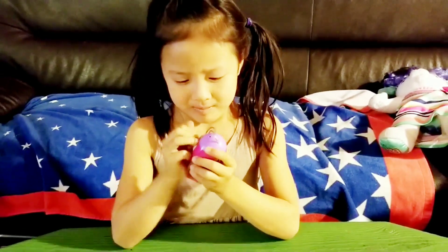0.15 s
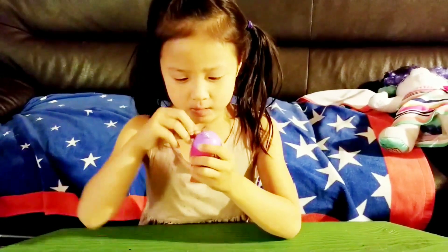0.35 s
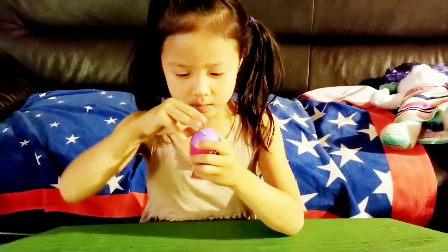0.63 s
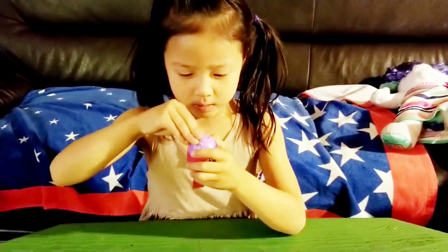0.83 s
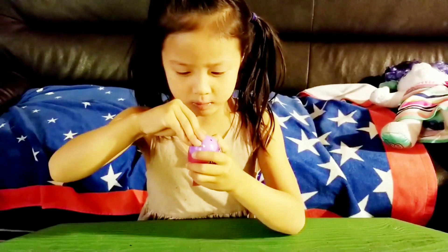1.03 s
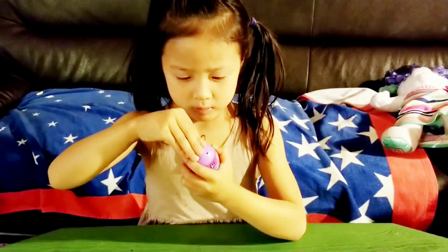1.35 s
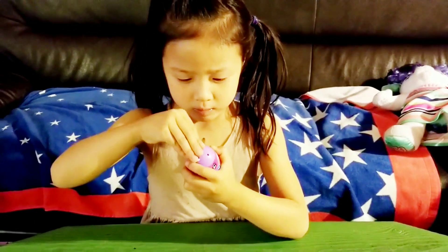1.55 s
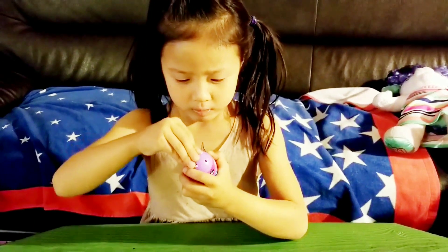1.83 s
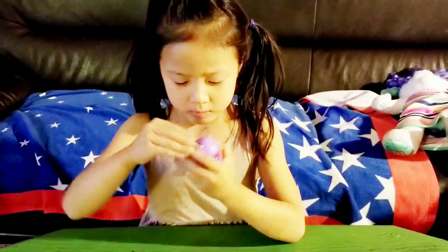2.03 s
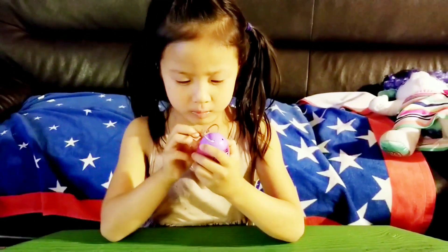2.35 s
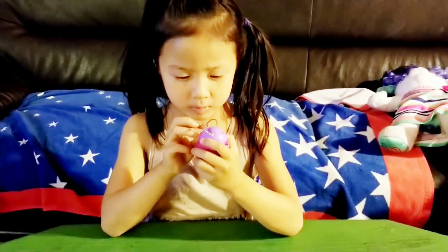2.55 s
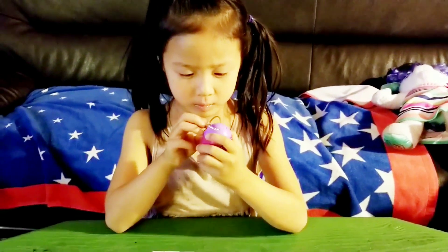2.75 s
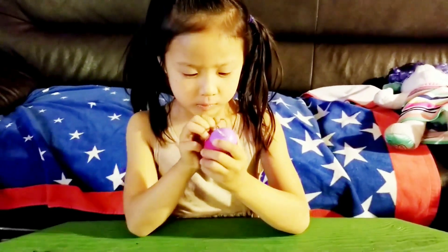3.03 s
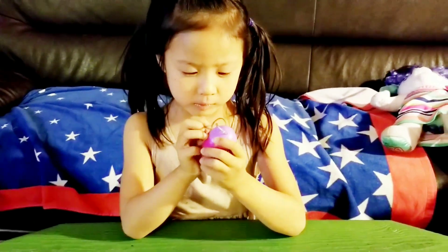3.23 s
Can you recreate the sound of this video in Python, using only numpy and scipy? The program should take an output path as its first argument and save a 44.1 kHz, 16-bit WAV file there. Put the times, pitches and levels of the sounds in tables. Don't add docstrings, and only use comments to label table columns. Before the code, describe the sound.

Small hollow plastic capsule clicks and snaps as fingers twist it in a quiet room

```python
import sys
import numpy as np
from scipy import signal
from scipy.fft import rfft, irfft
from scipy.io import wavfile
from scipy.ndimage import uniform_filter1d, minimum_filter1d

SR = 44100
rng = np.random.default_rng(int(sys.argv[2]) if len(sys.argv) > 2 else 0)


def gain_from_db(level_db):
    decades = np.asarray(level_db, float) / 20
    return 10 ** decades


def store_wav(level_fs):
    pcm = np.round(np.clip(np.atleast_2d(level_fs), -1, 1) * 32767)
    wavfile.write(sys.argv[1], SR, pcm.T.astype(np.int16))


N = 149940


def evened(x):
    return x / np.sqrt(np.mean(x ** 2) + 1e-20)


def wander(count, size):
    once = uniform_filter1d(rng.standard_normal(count), size=size)
    return evened(uniform_filter1d(once, size=size))


def read(points, hz):
    f, value = np.transpose(points)
    return np.interp(np.log(hz + 1), np.log(f + 1), value)


def add(mix, s, sound):
    part = mix[round(s * SR):][:len(sound)]
    part += sound[:len(part)]


def resonate(x, hz, width):
    turn = np.exp(2j * np.pi * np.cumsum(hz * np.ones(len(x))) / SR)
    r = np.exp(-np.pi * abs(width) / SR)
    return 2 * (turn * signal.lfilter([1 - r], [1, -r], x / turn + 1e-18)).real


def coloured(x, gain_db):
    log = np.log(gain_from_db(np.maximum(gain_db(np.fft.rfftfreq(1024, 1 / SR)), -90)))
    cepstrum = irfft(log) * np.r_[1, 2 * np.ones(511), 1, np.zeros(511)]
    return signal.fftconvolve(x, irfft(np.exp(rfft(cepstrum))))


def whitened(x):
    z = rfft(x)
    return irfft(z / np.sqrt(uniform_filter1d(abs(z) ** 2, size=5) + 1e-20), len(x))


def bell(hz, centre_hz, octaves):
    return -6 * (np.log2((hz + 20) / centre_hz) / max(octaves, .1)) ** 2


# f/Hz, width/Hz, level/dB
HUM = [(95.26, 21, -65), (190, 27, -60), (354, 29, -70), (828.6, 48, -76.5)]


def hum():
    out = np.zeros(N)
    for hz, width, db in HUM:
        noise = rng.standard_normal(N)
        out += gain_from_db(db) * evened(resonate(resonate(noise, hz, width), hz, width))
    return out


# f/Hz, level/dB
AIR = [(25, -4), (100, -1.5), (300, -8), (900, -26.5), (2200, -32), (5100, -43), (5800, -48.5),
       (10300, -47)]


def air():
    frames, hz = N // 256 + 5, np.fft.rfftfreq(1024, 1 / SR)
    a, b, patches = rng.standard_normal((frames, 513, 3)).T
    patches = uniform_filter1d(patches, size=10, axis=0)
    patches = evened(uniform_filter1d(patches, size=12, axis=1))
    z = (a + 1j * b) * gain_from_db(read(AIR, hz)[:, None] + 1.6 * patches)
    noise = signal.istft(z, nperseg=1024, noverlap=768)[1][:N]
    return gain_from_db(-55) * evened(noise) + hum()


# t/s, level/dB
RUB = [
    (.0, -55),
    (0.1, -62),
    (.17, -95),
    (1.7, -95),
    (1.8, -66),
    (1.87, -64),
    (1.93, -95),
    (3.3, -95),
    (3.4, -62),
]
# f/Hz, width/Hz, level/dB
RUB_BODY = [(2920, 17, 3.5), (3080, 160, -7.5), (4206, 190, -5)]


def rub():
    noise, (s, db) = rng.standard_normal(N), np.transpose(RUB)
    drift = 1 + .01 * wander(N, size=3000)
    body = np.zeros(N)
    for hz, width, gain_db in RUB_BODY:
        once = resonate(noise, hz * drift, 2.8 * width)
        body += gain_from_db(gain_db) * evened(resonate(once, hz * drift, 4.0 * width))
    pressure_db = np.interp(np.arange(N) / SR, s, db) + 0.73 * wander(N, size=400)
    return gain_from_db(pressure_db) * evened(body)


# f/Hz, width/Hz, level/dB
FIDGET = [(1500, 700, -81), (3300, 700, -81), (4500, 1100, -78)]


def fidget():
    out = np.zeros(N)
    for hz, width, db in FIDGET:
        hz = hz * (1 + .06 * wander(N, size=4000))
        level = gain_from_db(db + 3.2 * wander(N, size=1800))
        noise = rng.standard_normal(N)
        out += level * evened(resonate(resonate(noise, hz, width), hz, width))
    return out


# f/Hz, width/Hz, level/dB
SHELL = [(1339, 200, -14.5), (1820, 440, -14), (3050, 330, 1), (4170, 2200, -8), (5087, 200, -4),
         (5880, 340, -5), (6800, 560, -10.5), (7800, 120, -10.5), (8510, 950, -6.5), (9700, 490, -10.5)]


def shell(x):
    return sum(gain_from_db(db) * resonate(x, hz, width) for hz, width, db in SHELL)


def scrape(length, db, hz, octaves):
    grains_per_s, grain_spread_db = 5000, 0.5
    chance, size, value = rng.random((4000, 3)).T[:, :round(length * SR)]
    slips = (chance < grains_per_s / SR) * gain_from_db(-grain_spread_db * np.log(size + 0.00044))
    grains = (value - .5) * (0.28 + slips)
    grains *= np.sin(np.pi * np.linspace(0, 1, len(grains)) ** .7) ** 1.3
    both = evened(grains) + 1.3 * evened(shell(grains))
    return gain_from_db(db) * evened(coloured(both, lambda f: bell(f, hz, octaves)))


# t/s, length/s, level/dB, centre f/Hz, spread/octaves
SCRAPES = [(0.0102, 0.012, -47.5, 4277, 1.9), (0.028, 0.067, -48, 4130, 1), (0.1, 0.047, -54, 5500, 0.9),
           (0.143, 0.075, -58, 3800, 0.59), (1.227, 0.036, -77.5, 2720, 0.13),
           (1.778, 0.017, -62, 860, 0.29), (1.099, 0.018, -48, 1450, 0.68), (1.1, 0.035, -54, 470, 0.77),
           (0.87, 0.0085, -71.5, 5880, 0.059), (1.887, 0.037, -53.5, 600, 0.78),
           (0.021, 0.034, -58.5, 700, 0.28), (.44, .06, -61, 480, .5), (1.472, .008, -72, 3900, .4),
           (0.366, 0.045, -63, 5200, .8), (0.434, 0.042, -64, 4500, 0.4), (0.6, 0.04, -54, 800, .75),
           (0.59, 0.07, -61, 3830, 0.7), (.71, 0.045, -59.5, 521, 0.53), (0.901, 0.039, -71, 2850, 0.27),
           (1.097, 0.05, -43.5, 4536, 1.12), (1.467, 0.054, -81.5, 5200, 0.74),
           (1.609, 0.033, -74, 2380, 0.26), (1.769, 0.07, -55, 4100, 0.95), (1.888, 0.032, -48, 1935, 1.37),
           (2.013, 0.074, -68, 4340, 0.2), (2.483, .02, -84, 6000, 1.35), (2.767, 0.038, -57.5, 5432, 1.5),
           (2.853, 0.047, -80, 8650, 0.71), (2.971, 0.036, -47.5, 5200, 0.69),
           (3.098, 0.1, -47, 4968, 1.345), (3.134, 0.023, -41.5, 3900, 1.1),
           (3.119, 0.038, -51, 1046, 0.31), (3.163, 0.028, -54.5, 3650, 0.12),
           (3.358, 0.039, -57.5, 3480, 0.7)]


def scrapes():
    out = np.zeros(N)
    for s, *row in SCRAPES:
        add(out, s, scrape(*row))
    return out


# f/Hz, level/dB
CRACK = [(180, -57), (300, 1.5), (1790, -16), (2060, -2), (4090, 0.5), (6820, 2), (8350, -29.5),
         (10100, -15.5), (12300, -39), (16000, -76), (22000, -120)]


def snap(peak_db, hz, ring, stretch):
    snap_s, focus_oct, focus_db = .0012, .18, 11
    t = np.arange(900) / SR / np.clip(stretch, .4, 4)
    cracks = rng.standard_normal(len(t)) * rng.exponential(1, len(t))
    cracks *= t / snap_s * np.exp(-2 * t / snap_s)
    cracks = whitened(cracks) * np.exp(-(t / snap_s / 2.5) ** 4)
    ring = np.clip(ring, 0, 1)
    direct = evened(coloured(cracks, lambda f: read(CRACK, f))[:len(t)])
    body = (1 - ring) * direct + ring * evened(shell(cracks))

    def focus(f):
        low_cut = 6 * np.log2(np.clip(f / 900, .01, 1))
        return focus_db * gain_from_db(bell(f, hz, focus_oct)) + low_cut

    body = coloured(body, focus)
    return gain_from_db(peak_db - 6) * body / abs(body).max()


# t/s, peak level/dB, brightest f/Hz, shell ring share 0-1, relative length
SNAPS = [(0.0202, -3, 5830, 0.45, 0.68), (0.021, -3, 4100, 0.5, 0.79), (.0221, -3.5, 7830, 0.52, 1.3),
         (0.0309, -18.5, 3330, 0.8, 1.3), (0.0401, -15, 3030, 0.8, 2), (0.048, -18, 3670, 0.3, 1.3),
         (0.062, -21, 6660, 1, 1.8), (0.111, -45, 7000, 0.4, 1.1), (0.1384, -15.5, 4460, 0.49, 1.13),
         (0.595, -42, 4300, 0.37, 4.3), (0.6828, -27.5, 4870, 0.73, 1.8), (0.6895, -29, 6200, 0.46, 1.13),
         (0.8753, -39, 5840, 1, 1.4), (1.0928, -21, 5300, 0.54, 3.2), (1.1005, -21.5, 4040, 0.1, 2),
         (1.1038, -13, 4150, 0, 3), (1.115, -31, 4400, .4, 2.5), (1.7859, -26, 4630, 0.5, 2.96),
         (1.8889, -19.5, 5600, 0.56, 2.5), (1.896, -28, 3700, 0.29, 1.1), (1.9009, -17.5, 4200, 0.5, 1.45),
         (2.7645, -23, 2900, 0.9, 1.3), (2.797, -31.5, 4930, 0.23, 1.5), (2.9736, -29, 3050, 1, 1.07),
         (2.98, -23.5, 3010, 1, 1.12), (3.038, -32.5, 5030, 0.5, 0.79), (3.1168, -27.5, 5100, 0, 2.3),
         (3.1226, -8, 4660, 0.84, 2.3), (3.129, -14.5, 3130, 0.37, 1.5), (3.1317, -15.5, 4320, 0.6, 3.1),
         (3.1367, -15.5, 3200, 0.8, 2.2), (3.174, -30, 3280, 0.6, 1.5), (3.184, -46, 3080, 1, 1.8),
         (3.167, -32, 3200, 0.7, 1.1), (3.2063, -32, 3080, 0.5, 0.87), (3.2285, -16, 5000, 0, 1.07),
         (3.229, -20, 3080, 1, 1.1), (3.3467, -23.5, 4090, 0.48, 1.6), (3.3557, -25, 2730, 1, 1.1)]


def snaps():
    out = np.zeros(N)
    for s, *row in SNAPS:
        add(out, s, snap(*row))
    return out


def decay(db, hz, t60, rise_s, waver_db, loose):
    t = np.arange(0, .6, 1 / SR)
    turns = np.cumsum(hz * (1 + loose * wander(len(t), size=400))) / SR
    db = db - 60 * t / t60 + waver_db * wander(len(t), size=500)
    return gain_from_db(db) * np.sqrt(2) * np.sin(2 * np.pi * turns) * (1 - np.exp(-t / rise_s))


THUMP_S = [.025, .04, .045, .07, .6, 1.1, 1.11, 1.775, 1.89, 2.29, 2.87, 3.13, 3.17, .03, 1.13, 1.9, .93]
# level/dB, f/Hz, t60/s
THUMPS = [(-40.5, 71, 0.2), (-41, 170, 0.4), (-39, 210, 0.28), (-42.5, 330, 0.52), (-53.5, 310, 0.23),
          (-29.5, 64, 0.059), (-40, 95, 0.25), (-46.5, 67, 0.13), (-42.5, 87, 0.24), (-79, 96, 0.093),
          (-36, 218, 0.05), (-43, 61, 0.2), (-44, 280, 0.14), (-40, 260, 0.083), (-41.5, 200, .25),
          (-43.5, 210, 0.23), (-57.5, 570, 0.19)]


def thumps():
    out = np.zeros(N)
    for s, row in zip(THUMP_S, THUMPS):
        add(out, s, decay(*row, rise_s=.006, waver_db=2.5, loose=.2))
    return out


# t/s, level/dB, f/Hz, t60/s
RINGS = [
    (.155, -56, 4360, .5),
    (.284, -49, 4360, .12),
    (.225, -61, 3957, .5),
    (.032, -44, 5018, .12),
    (1.325, -71, 3520, .2),
    (1.37, -73, 4250, .12),
    (1.502, -69, 4280, .2),
    (1.62, -72, 4020, .2),
    (1.685, -74, 3040, .5),
]


def rings():
    out = np.zeros(N)
    for s, *row in RINGS:
        add(out, s, decay(*row, rise_s=0.012, waver_db=3.0, loose=0.003))
    return out


# f/Hz, t60/s
ROOM = [(250, 1), (660, 0.28), (1740, 0.32), (4590, 0.22), (10000, 0.15)]


def room(x):
    taps = np.zeros(SR // 2)
    at = np.arange(180, SR // 2 - 12, 12)
    taps[at + rng.integers(0, 12, len(at))] = rng.choice([-1., 1.], len(at))
    hz, t, z = signal.stft(taps, SR, nperseg=256)
    fall_db = -60 * t / read(ROOM, hz)[:, None]
    tail = signal.istft(z * gain_from_db(fall_db), SR, nperseg=256)[1]
    return signal.fftconvolve(x, tail / np.linalg.norm(tail))[:N]


def turning_room(x):
    turn = np.arange(N) / SR * 9
    tails = sum(room(x * np.cos(turn + k * np.pi / 3)) for k in range(3))
    return tails * np.sqrt(2 / 3)


# f/Hz, level/dB
SIDE_TILT = [(40, -2.5), (300, -5), (1000, -1), (4000, 5.5), (8000, 15.5), (12000, 8)]


def side_field(hand):
    side_air = coloured(air(), lambda f: read(SIDE_TILT, f))[:N]
    return gain_from_db(-18.5) * (side_air + gain_from_db(-4) * room(hand))


def scene():
    hand = rub() + fidget() + scrapes() + snaps()
    mid = hand + thumps() + rings() + gain_from_db(-7) * turning_room(hand) + air()
    side = side_field(hand)
    return np.array([mid + side, mid - side])


def top_cut(x):
    return signal.sosfilt(signal.butter(12, 12470, fs=SR, output="sos"), x)


# t/s, level/dB
TOP_BAND = [(.0, -18.5), (.2, -16.5), (1.0, -29), (2.75, -13.5)]


def record(dry):
    t = np.arange(N) / SR
    high_pass = signal.butter(2, 900, "high", fs=SR, output="sos")
    high = signal.sosfiltfilt(high_pass, dry)
    level_db = 10 * np.log10(abs(uniform_filter1d((high ** 2).mean(0), 180)) + 1e-12)
    ahead_db = np.r_[-minimum_filter1d(-level_db, size=700)[450:], np.full(450, -90.)]
    duck_db = np.clip(1.3 * (ahead_db - level_db - 23), 0, 20)
    x = dry - high * (1 - gain_from_db(-uniform_filter1d(duck_db, size=60)))
    x = x * np.clip((t - .0125) / .002, .05, 1)

    def low_pass(hz):
        taps = signal.firwin(301, hz, window=("kaiser", 8), fs=SR)
        return signal.oaconvolve(x, taps[None], "same")

    main, wide = low_pass(10550), low_pass(12300)
    top_db = np.interp(t, *np.transpose(TOP_BAND))
    top_db = top_db + np.clip(uniform_filter1d(level_db, size=300) + 52, -25, 0)
    return top_cut(main + gain_from_db(top_db) * (wide - main))


dry = scene()
out = record(dry)
store_wav(out)
```